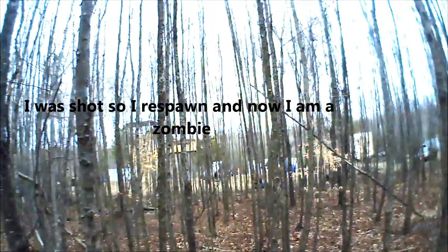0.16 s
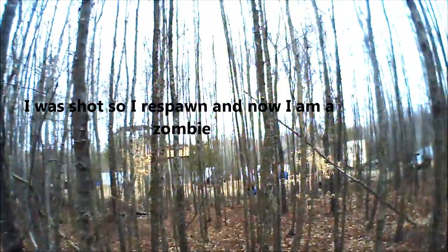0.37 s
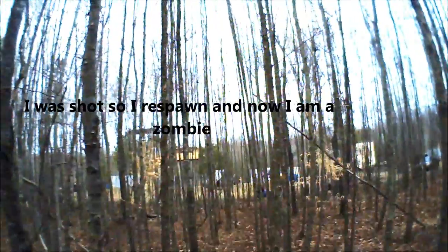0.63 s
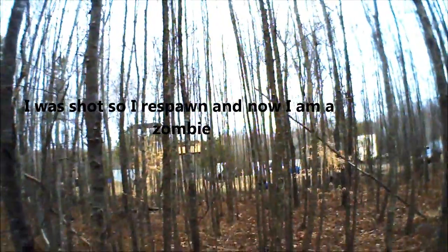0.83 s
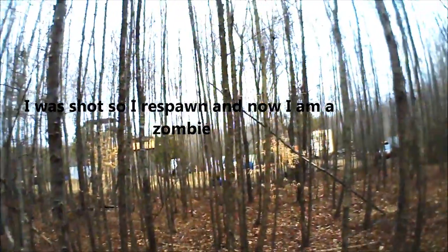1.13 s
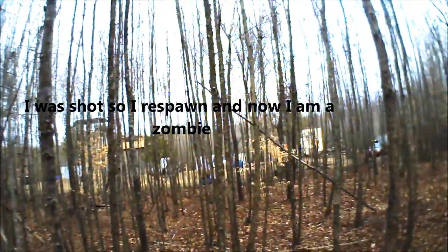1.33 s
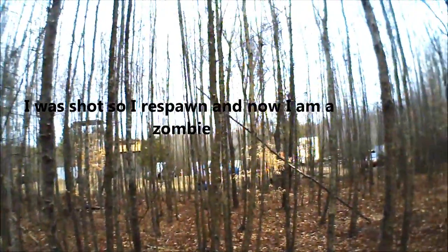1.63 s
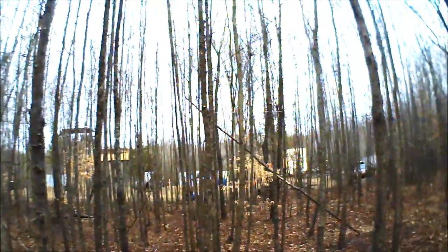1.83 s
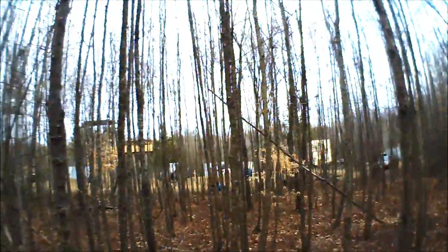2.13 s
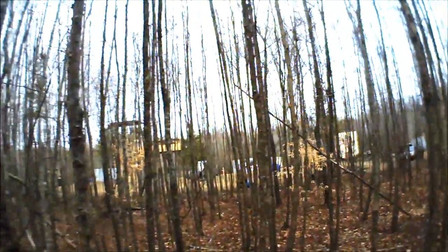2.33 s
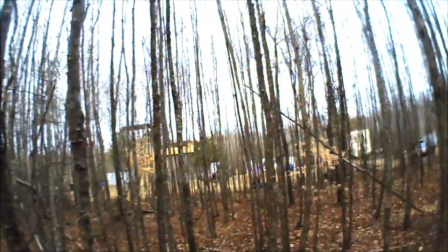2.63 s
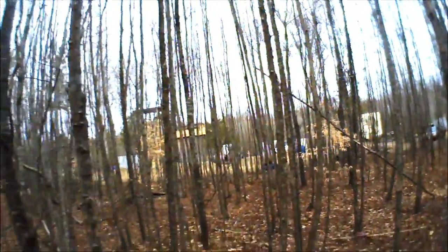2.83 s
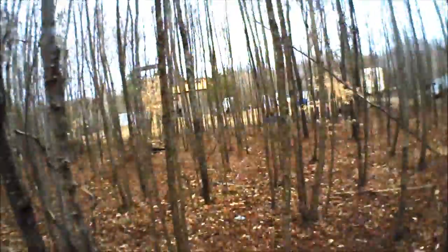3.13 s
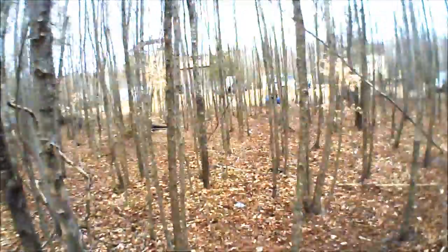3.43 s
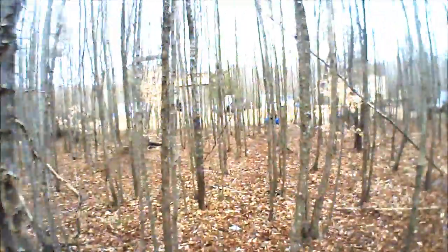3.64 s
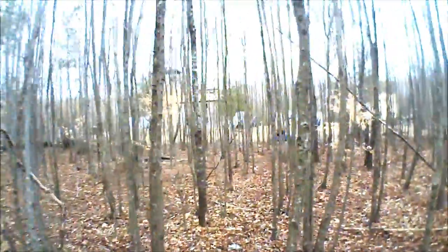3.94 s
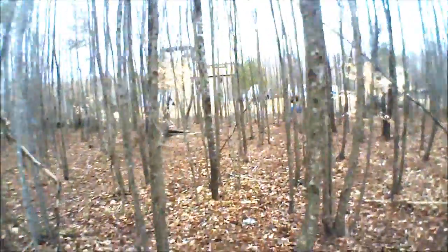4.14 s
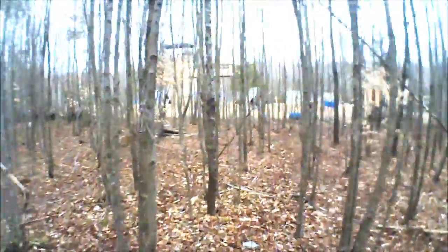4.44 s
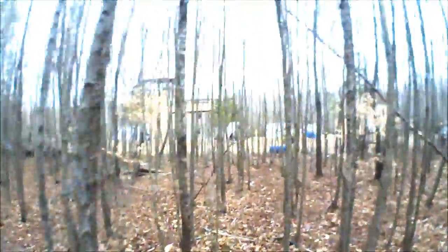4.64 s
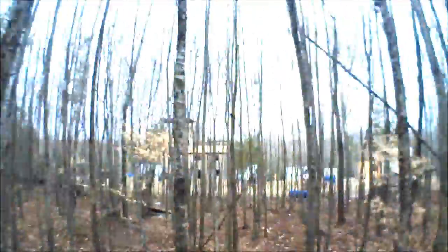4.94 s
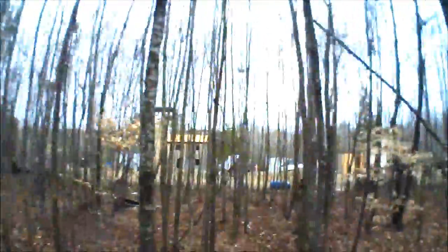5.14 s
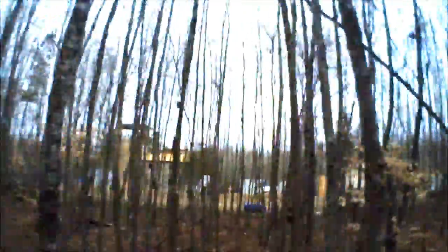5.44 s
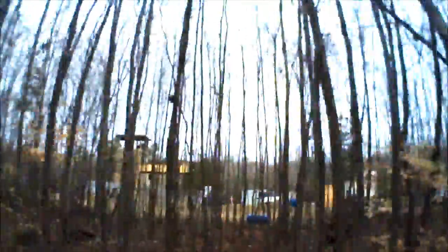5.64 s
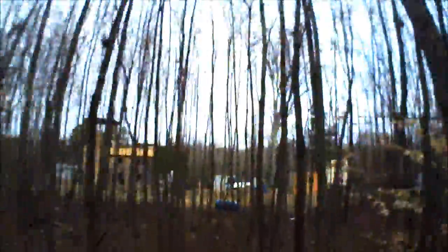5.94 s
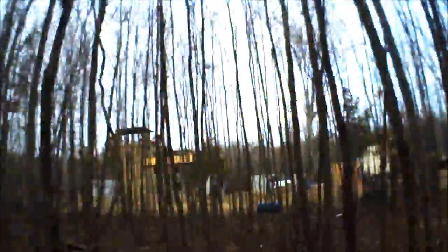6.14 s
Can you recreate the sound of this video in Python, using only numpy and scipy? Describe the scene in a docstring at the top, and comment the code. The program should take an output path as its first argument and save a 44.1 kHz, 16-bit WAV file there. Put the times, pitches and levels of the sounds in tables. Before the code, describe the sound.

Someone starts almost still among dry leaves, with low wind flutter and a faint steady electronic whine and ticking. A brief crackling step comes early, then mostly quiet litter stirring. Later, vigorous strides bring dense plastic-coloured crunching, bright snaps, dull knocks and heavy booming jolts, all very close to the head-mounted microphone outdoors.

```python
"""In a wood, someone walks through dry leaves with a small camera on the head.
Leaves crush and crackle as bursts of tiny random breaks, and twigs snap as short bursts of noise.
The plastic housing colours much of this. Gears knock against a mount that rings.
Wind (filtered noise) and the jolts of each stride (single humps of pressure) push the microphone.
Faint whistles waver, and the electronics whine, hum, chirr, hiss and tick underneath."""
import sys
import numpy as np
from scipy import signal
from scipy.fft import rfft, irfft
from scipy.io import wavfile
from scipy.ndimage import uniform_filter1d

SR = 44100
rng = np.random.default_rng(int(sys.argv[2]) if len(sys.argv) > 2 else 0)


def store_wav(level_fs):
    """Save 16-bit WAV to argv[1]."""
    pcm = np.round(np.clip(np.atleast_2d(level_fs), -1, 1) * 32767)
    wavfile.write(sys.argv[1], SR, pcm.T.astype(np.int16))


N = 276948  # length [samples]

# colour of large leaves being crushed, also the body of a snap: (frequency [Hz], filter gain [dB])
CRUSH_COLOUR = [(1300, -76), (1650, -1.5), (2300, -4.5), (3000, -7.5)]
# colour of fine litter swishing, also the sizzle of a snap: (frequency [Hz], filter gain [dB])
SWISH_COLOUR = [(6500, -6), (8000, -1.5), (11000, 3.5), (12700, -2), (13300, -8), (15000, 0), (16000, -22)]


def leaves():
    """Shoes scuff, large leaves crush dully, edges crackle and fine litter swishes, each by its own level."""
    # colours of the scuff and the crackle: (frequency [Hz], filter gain [dB])
    scuff_colour = [(600, -31), (900, -16.5), (1150, -0.5), (1500, 6), (1750, -3), (2100, -47)]
    crackle_colour = [(2000, -30), (2800, 5), (5000, -3), (7000, -2.5), (8500, -17)]
    # where the crackle is fullest: (time [s], centre [Hz], lift [dB])
    bite = [(0, 4000, -0.5), (1.1, 4150, 1), (1.33, 6200, 4.5), (1.55, 4220, -6), (1.72, 6040, 5),
            (2.0, 3750, 1.5), (3.2, 4000, 4), (4.1, 4300, 5), (4.5, 5330, 0), (5.3, 4700, 3.5),
            (6.28, 4560, 1)]
    # where the swish is brightest, as the litter changes: (time [s], centre [Hz], lift [dB])
    sheen = [(0, 10200, 3), (1.33, 9600, 5.5), (1.8, 10200, 1), (3.3, 11000, 0), (4.8, 11100, 2),
             (5.3, 11200, -9), (5.45, 12000, 10.5), (5.7, 10700, -2), (6.08, 11700, 5), (6.28, 10900, 5)]

    unevenness = gain_of(0.3 * lumps(4))  # shared by all four
    scuff_grains = unevenness * grains(4000, 1.0, 0.39)
    crush_grains = unevenness * grains(5000, 2.47, 0.21)
    crackle_grains = patchy(unevenness * grains(7000, 0.87, 0.24), 2.1, bite)
    swish_grains = patchy(unevenness * grains(9000, 1.9, 1.05), 1.35, sheen)

    scuff = evened(shaped(scuff_grains, scuff_colour))  # the scuff alone bypasses the housing
    crush = evened(housed(shaped(crush_grains, CRUSH_COLOUR)))
    crackle = evened(housed(shaped(crackle_grains, crackle_colour)))
    swish = evened(housed(shaped(swish_grains, SWISH_COLOUR)))
    return (leaf_levels() * np.array([crush, scuff, crackle, swish])).sum(axis=0)


def leaf_levels():
    """Loudness of crush, scuff, crackle and swish: bursts swell and fade over a steady stirring."""
    # steady stirring of the litter: (time [s], crush level [dB])
    stir = [(0.0, -62.5), (0.5, -61), (0.75, -65), (1.1, -57), (1.6, -65.5), (2.3, -59.5), (2.6, -65),
            (3.1, -66), (3.6, -61.5), (4.1, -53), (4.4, -50.5), (5.0, -43.5), (6.28, -45)]
    # stirring levels of scuff, crackle and swish, relative to crush [dB]
    stir_colour_db = [-11, -4, -4]
    # a burst of leaf noise, dull, crackling or swishing, swells and fades:
    # (start [s], rise [s], hold [s], fall [s], crush level [dB],
    # then relative to crush: scuff [dB], crackle [dB], swish [dB])
    leaf_bursts = [(0.055, 0.019, 0.075, .03, -57, -9, -0.5, -6),
                   (0.166, 0.017, 0.036, .08, -62, -9, 3, -4), (1.034, 0.08, 0.079, 0.046, -74, -16, 3, -4),
                   (1.1, .015, 0.01, 0.034, -62, -12, 13, -2),
                   (1.164, .015, 0.014, 0.036, -59.5, -16, 10.5, 0),
                   (1.173, .08, 0.054, .05, -49, -21, 2, -14),
                   (1.259, 0.069, 0.019, 0.051, -36.5, -13.5, 2.5, 0.5),
                   (1.353, 0.032, 0.019, 0.21, -49.5, -13, 2.5, 4.5),
                   (1.641, 0.096, 0.014, 0.057, -41.5, -14.5, 7, 4),
                   (1.717, 0.052, 0.047, .12, -41, -23, -5.5, -3),
                   (1.925, 0.073, 0.045, 0.14, -52.5, -18, -7, -17),
                   (2.078, 0.055, 0.097, 0.16, -61, -9, -7, -13),
                   (3.136, 0.036, 0.24, 0.26, -60.5, -16, 2.5, 0),
                   (3.15, 0.12, 0.18, .12, -67, -7, -2, 11.5), (3.612, 0.079, 0.11, .1, -58.5, -22, 0, -2),
                   (3.74, .1, .15, 0.13, -58, -14, 3, 5), (4.13, 0.11, .1, 0.18, -47, -22, -6.5, -16),
                   (4.294, 0.091, 0.043, .08, -43, -12, -8, -20),
                   (4.392, 0.073, 0.064, 0.16, -41.5, -6, -1, -3),
                   (4.547, 0.043, 0.025, 0.051, -42.5, -1.5, -4, -5),
                   (4.657, 0.057, 0.087, 0.096, -40.5, -5.5, -4.5, -13),
                   (4.888, 0.059, 0.035, .05, -45.5, -4, -5, -3),
                   (4.96, 0.042, .02, 0.045, -46.5, -4, 1, 4), (5.0, 0.047, 0.051, 0.15, -42, -8, -4, -13),
                   (5.241, 0.055, 0.027, 0.058, -44, -9, 1.5, 5.5),
                   (5.355, .05, 0.06, 0.092, -44.5, -11.5, 4, 6.5),
                   (5.51, 0.059, 0.11, 0.14, -41, -5.5, -2.5, -6),
                   (5.696, 0.045, .13, 0.23, -43, -2.5, -1, -7.5),
                   (5.899, 0.046, 0.074, 0.067, -42, -3.5, 1, -1.5),
                   (6.008, 0.042, 0.068, 0.066, -42.5, -2, 4.5, 5.5),
                   (6.159, .06, 0.043, 0.026, -36.5, -7, 3, -5)]
    slope_db = 20  # change of level over one rise or one fall

    t = np.arange(N) / SR
    stir_db = columns(stir)[0] + np.array([0, *stir_colour_db])[:, None]
    power = gain_of(stir_db) ** 2
    for start, rise, hold, fall, crush_db, *colour_db in leaf_bursts:
        before = 1 - (t - start) / rise
        after = (t - start - rise - hold) / fall
        distance = np.maximum(np.maximum(before, after), 0)  # 0 during the hold
        peaks = gain_of(crush_db + np.array([0, *colour_db]))
        power += np.outer(peaks, gain_of(-slope_db * distance)) ** 2
    return np.sqrt(power)


def grains(per_s, spread_db, clump_db):
    """Many tiny breaks of unequal size, at random times, stronger in some clumps than in others."""
    size_db = spread_db * np.minimum(rng.exponential(1, N), 4) + clump_db * lumps(7.4)
    breaks = rng.random(N) < per_s / SR
    return gain_of(size_db) * rng.standard_normal(N) * breaks


def patchy(x, patch_db, lift=None):
    """Colour that wanders in patches, as each leaf rings in its own way; a lift may glide through it."""
    hz, t, spectrum = signal.stft(x, SR, nperseg=256)
    field = rng.standard_normal(spectrum.shape)
    field = uniform_filter1d(field, size=4, axis=0)  # smooth over frequency
    field = uniform_filter1d(field, size=12, axis=1)  # smooth over time
    field_db = patch_db * evened(field)
    if lift:
        s, centre, lift_db = np.transpose(lift)
        away = (hz[:, None] - np.interp(t, s, centre)) / 600
        field_db += np.interp(t, s, lift_db) * np.exp(-away ** 2)
    return signal.istft(spectrum * gain_of(field_db), nperseg=256)[1][:len(x)]


def snaps():
    """Twigs and stiff leaves snap: a sudden burst of splinters that dies within a few ms."""
    # (time [s], crack level [dB], body relative to crack [dB], sizzle relative to crack [dB],
    # decay time constant [ms])
    snap_list = [(0.0702, -58, 14, 1, 2), (0.136, -47, 4, -3, 2.3), (0.853, -58, 16, -1, 2),
                 (1.33, -29, -7, 8, 1.5), (1.339, -32, -12, 1, 1.5), (1.4358, -41, -20, 11, 1.8),
                 (1.6805, -43, -6, -3, 2), (1.7296, -30, -9, 0, 3.5), (1.7363, -28.5, -6, 4, 3.2),
                 (1.7844, -34, -5, 4, 2), (1.8054, -37, -10, -3, 2.2), (4.1365, -48.5, 11.5, 2, 2.5),
                 (4.8895, -27, -6, -5, 5.3), (4.8951, -29.5, -8, -5, 5), (4.95, -37, -7, -10, 2.2),
                 (4.9996, -42, -1, -5, 2.4), (5.252, -25.5, -10, -8, 2.7), (5.3108, -35, -7, -8, 4.1),
                 (5.467, -37, -19, 13.5, 3), (5.5114, -53, 2, -6, 2), (5.5877, -22.5, -23, -4, 4.8),
                 (5.8587, -22, -11, -1, 4.3), (6.0774, -34, -5, 4, 2), (6.1478, -23.5, -18, -2.5, 3.8),
                 (6.184, -32, -14, 0, 3.6), (6.2095, -37, 5, 13.5, 2.3), (6.2429, -22.5, 6, 3.5, 4),
                 (6.2624, -43, -12, -16, 1.7)]
    # colour of the splintering crack: (frequency [Hz], filter gain [dB])
    splinter_colour = [(2000, -7), (3000, 5), (4800, 8), (6500, 9.5), (7500, -8), (9000, -75)]
    fibres_db, fibres_late = -19, 295  # the last fibres give way about 7 ms later [dB, samples]
    lead = 512  # room ahead of the snap for the filters [samples]

    out, t = np.zeros(N), np.arange(4096) / SR
    for s, crack_db, body_db, sizzle_db, decay_ms in snap_list:
        fade = np.minimum(t / 0.00086, 1) * np.exp(-t / (decay_ms / 1000))
        fade = np.roll(fade, lead) + gain_of(fibres_db) * np.roll(fade, lead + fibres_late)
        burst = fade * rng.standard_normal(len(t))
        parts = (shaped(burst, splinter_colour),
                 housed(shaped(burst, CRUSH_COLOUR)),
                 housed(shaped(burst, SWISH_COLOUR), -54))
        # give all three parts the energy of the fade
        crack, body, sizzle = (p / np.linalg.norm(p) * np.linalg.norm(fade) for p in parts)
        sound = crack + gain_of(body_db) * body + gain_of(sizzle_db) * sizzle
        add(out, s - lead / SR, gain_of(crack_db) * sound)
    return out


def knocks():
    """Gear knocks on its mount: a short blow pushes the air once and sets low and high modes ringing."""
    # (time [s], thud drive [dB], ring drive [dB], scale of the first push [dB])
    knock_list = [(4.1351, -29.5, -43.5, -36), (4.8947, -33, -20, -17.5), (4.973, -30, -46, -28),
                  (5.2763, -21, -34, -26), (5.619, -29.5, -55, -24)]
    # modes of the mount: (frequency [Hz], level added to the drive [dB], time to fall 60 dB [s],
    # kind [0 thud, 1 ring])
    mount_modes = [(128, -2, 0.13, 0), (181, -1, 0.024, 0), (470, 5, 0.0048, 0), (780, 7, 0.018, 1),
                   (1120, 8.5, 0.019, 1), (1340, 5, 0.01, 1)]

    out, t = np.zeros(N), np.arange(4000) / SR
    u = t / 0.00047
    push = u * (1 - u / 3) * np.exp(1 - u)
    for s, *drive_db, push_db in knock_list:
        add(out, s, gain_of(push_db) * push)
        for hz, db, t60, kind in mount_modes:
            fade = gain_of(db - 60 * t / t60) * np.minimum(t / 0.0013, 1)
            mode = fade * np.cos(2 * np.pi * hz * t)
            add(out, s, gain_of(drive_db[round(kind)]) * mode)
    return out


def jolts():
    """The head jolts and pushes the membrane: one hump of pressure with a dip on either side."""
    # (time of the peak [s], peak level [dB], half width of the hump [ms])
    jolt_list = [(2.305, -28.5, 7.1), (2.352, -30, 6.6), (2.825, -26, 8.1), (4.168, -12.5, 18),
                 (4.247, -11, 14), (4.526, -11.5, 12.6), (4.596, -6, 6.5), (5.012, -10.5, 9.1),
                 (5.066, -15, 5.6), (5.108, -10, 9.7), (5.214, -7.5, 11), (5.423, -31, 7),
                 (5.566, -4, 17.6), (5.652, -5, 8), (5.709, -13, 6.2), (5.841, -11.5, 4.7),
                 (5.931, -11, 14), (6.001, 0, 7.5), (6.021, 0.5, 11.1), (6.259, -9, 11.5)]
    out, t = np.zeros(N), np.arange(-2646, 2646) / SR
    for s, db, half_ms in jolt_list:
        u = t / (half_ms / 1000)
        hump = (1 - u ** 2) * np.exp(-u ** 2 / 2)
        add(out, s + t[0], gain_of(db) * hump)
    return out


def wind():
    """Air past the moving head: lumpy low pressure swings, a gusty roar and a hollower rush."""
    # slow trend: (time [s], rumble level [dB], roar level [dB], hollow rush level [dB])
    wind_trend = [(0.0, -38.5, -53, -66), (0.6, -39.5, -52.5, -68), (1.5, -45.5, -52, -64),
                  (1.9, -42.5, -50, -63), (2.7, -52.5, -54, -66.5), (3.3, -38, -53, -65),
                  (3.6, -34.5, -56, -64.5), (4.05, -35, -54.5, -67.5), (4.22, -31, -48.5, -57.5),
                  (4.4, -24, -49, -55), (4.6, -16, -44, -55.5), (4.76, -30, -47, -56),
                  (5.05, -12, -41.5, -53.5), (5.18, -21.5, -43.5, -50.5), (5.45, -14, -44, -56),
                  (5.75, -18, -42, -52), (6.02, -11, -36, -51.5), (6.15, -19.5, -43, -53.5),
                  (6.28, -11.5, -32.5, -40.5)]
    # single buffets on top of the rumble: (time of the peak [s], rumble level [dB], half width [s])
    buffets = [(0.2, -35, .05), (0.45, -36, 0.035), (0.71, -33.5, 0.019), (0.9, -24.5, 0.036),
               (1.15, -32.5, 0.055), (1.32, -31.5, 0.04), (1.56, -40.5, 0.026), (1.75, -31.5, 0.048),
               (2.01, -39, 0.064), (2.33, -42, .05), (2.51, -36, 0.04), (2.83, -39, 0.017),
               (3.1, -34.5, 0.077), (3.31, -29, 0.028), (3.5, -24.5, 0.032), (3.7, -28.5, 0.033),
               (3.88, -35, 0.025), (4.16, -21, 0.086), (5.299, -15, 0.059), (5.65, -8.5, 0.024),
               (5.849, -10.5, 0.021), (6.001, -6.5, 0.025)]
    # colours of the rumble, the roar and the hollow rush: (frequency [Hz], filter gain [dB])
    rumble_colour = [(2.9, -34), (5.0, 4), (21, 1.5), (40, -2.5), (52, -8.5), (76, -18.5), (200, -49.5),
                     (260, -66), (440, -120)]
    roar_colour = [(55, -53), (85, 3.5), (130, -4), (200, -16.5), (300, -17), (500, -31)]
    hollow_colour = [(250, -19), (400, -5.5), (540, -2), (750, -3), (1000, -6), (1500, -4)]

    rumble_db, roar_db, hollow_db = columns(wind_trend)
    t = np.arange(N) / SR
    power = gain_of(rumble_db) ** 2
    for s, db, half in buffets:
        power += gain_of(db) ** 2 * np.exp(-((t - s) / half) ** 2)
    rumble = evened(shaped(rng.standard_normal(N), rumble_colour))
    rumble /= np.sqrt(0.14 + 0.83 * uniform_filter1d(rumble ** 2, 6000))  # eddies keep a bounded strength

    gusts = lumps(4.5)
    roar = evened(shaped(rng.standard_normal(N), roar_colour) * gain_of(5.3 * gusts))
    hollow = evened(shaped(rng.standard_normal(N), hollow_colour) * gain_of(4.2 * gusts))
    return np.sqrt(power) * rumble + gain_of(roar_db) * roar + gain_of(hollow_db) * hollow


def whistles():
    """Faint tones and chirps that waver in pitch, flutter in level, and swell and fade."""
    # (start [s], end [s], frequency before wavering [Hz], level before flutter and fades [dB])
    whistle_list = [(0.608, 0.617, 2090, -50), (1.423, 1.67, 4230, -66), (2.446, 2.473, 2100, -57),
                    (2.84, 2.864, 2080, -58), (3.197, 3.357, 1060, -65), (3.484, 3.763, 3110, -66.5)]
    out = np.zeros(N)
    waver = np.cumsum(45 * lumps(9.0)) / SR  # pitch strays by about 45 Hz; in turns
    flutter = gain_of(4.3 * lumps(6.5))
    for start, end, hz, db in whistle_list:
        t = np.arange(start, end, 1 / SR)
        turns = hz * t + waver[round(start * SR):][:len(t)]
        tone = np.sqrt(2) * np.sin(2 * np.pi * turns)
        add(out, start, gain_of(db) * tone * signal.windows.tukey(len(t), .6))
    return out * flutter


def electronics():
    """Hiss, hum, whine and chirr, and a sag of the supply with a small tick at each picture frame."""
    # (time [s], whine level [dB], slip rate before the sag weighs it [per s], chirr drive [dB])
    whine_trend = [(0, -50, 1, -62), (1.9, -50, 0, -64), (2.2, -51, 25, -64), (3, -51, 40, -63),
                   (3.5, -51.5, 36, -65), (4.0, -51, 41, -80), (4.5, -52.5, 28, -85),
                   (6.28, -51.5, 18, -85)]
    # hum tones: (frequency [Hz], level [dB])
    hum_tones = [(375.5, -68), (404, -76), (625, -72), (877, -75.5), (1125, -78)]
    # tones of the frame tick: (frequency [Hz], level before the sag shapes it [dB])
    tick_tones = [(4270, -61.5), (5150, -63), (9000, -62)]
    # colour of the hiss: (frequency [Hz], filter gain [dB])
    hiss_colour = [(60, -37), (100, -5.5), (300, -20), (470, -24.5), (1500, -34), (2500, -27.5),
                   (4200, -31.5), (7000, -30), (9000, -26.5), (10500, -24), (12500, -27.5), (13500, -26),
                   (15900, -25)]
    whine_hz, chirr_hz, chirr_per_s = 10000.3, 12455, 32.6
    frame_hz, first_sag_s = 30.056, .0262  # frame rate, and when a sag is first deepest
    hiss_db, sag_db = -57.5, -36.5

    t = np.arange(N) / SR
    whine_db, slips_per_s, chirr_db = columns(whine_trend)

    frames = (t - first_sag_s + .004) * frame_hz + 1  # a sag is deepest 4 ms into its frame
    since, number = frames % 1 / frame_hz, frames.astype(int)
    uneven = rng.uniform(.6, 1.4, number[-1] + 1)[number]
    load = (.65 + .7 * (number % 2)) * uneven  # every second frame tends to draw more
    sag = load * (since / 0.0021) ** 2 * np.exp(2 - since / .002) / 4

    # now and then the whine slips one cycle, mostly while the supply sags
    chance = slips_per_s / SR * (.4 + 2.7 * sag)
    slips = uniform_filter1d(1. * (rng.random(N) < chance), 260)  # each slip takes about 6 ms
    turns = whine_hz * t - np.cumsum(slips) + 0.027 * lumps(3.6)
    slip_dip = 1 - 110 * np.minimum(slips, .005)  # the whine is weaker during a slip
    whine = gain_of(whine_db) * slip_dip * np.sin(2 * np.pi * turns)

    hum = np.zeros(N)
    for hz, db in hum_tones:
        hum += gain_of(db) * np.sin(2 * np.pi * (hz * t + rng.random() + 0.13 * lumps(61)))

    # a thin chirr switches on and off above the whine
    chirr = gain_of(chirr_db) * np.sin(2 * np.pi * (chirr_hz * t + .12 * lumps(6)))
    switching = np.clip(.5 + 1.5 * np.sin(2 * np.pi * chirr_per_s * t), 0, 1)
    chirr *= gain_of(2.3 * lumps(25)) * switching

    hiss = gain_of(hiss_db) * evened(shaped(rng.standard_normal(N), hiss_colour))

    tick = np.zeros(N)
    for hz, db in tick_tones:
        tick += gain_of(db) * np.sin(2 * np.pi * (hz * since + 0.1 * lumps(1.6)))
    tick *= sag / np.sqrt(load)

    supply = gain_of(sag_db) * (sag - uniform_filter1d(sag, 1500))  # the slow average is taken out
    return np.sqrt(2) * (whine + hum + chirr) + hiss + tick - supply


def housed(x, between_db=-17):
    """Passes sound through the resonances of the housing, with a weak direct path between them."""
    # air and wall resonances before the microphone: (frequency [Hz], width [Hz], level [dB])
    resonances = [(1926, 176, 2), (3164, 280, -15), (3893, 185, -2), (4920, 640, -15), (5750, 97, -14),
                  (6110, 110, -17), (7500, 150, -16.5), (8370, 430, -11), (10010, 1500, -11),
                  (10570, 320, -19), (11950, 590, -10)]
    f = np.fft.rfftfreq(len(x), 1 / SR)
    response = gain_of(between_db)
    for hz, width, db in resonances:
        response = response + gain_of(db) * 1j * f * width / (hz ** 2 - f ** 2 + 1j * f * width)
    return irfft(rfft(x) * response, len(x))


def shaped(x, points):
    """Filters by a curve of (frequency [Hz], gain [dB]) points; beyond its ends almost nothing passes."""
    hz, db = np.transpose(points)
    f = np.fft.rfftfreq(len(x), 1 / SR)
    curve_db = np.interp(np.log(f + 1), np.log(hz + 1), db, -90, -90)
    return irfft(rfft(x) * gain_of(curve_db), len(x))


def lumps(ms):
    """Smooth random curve of rms 1 that changes every few ms."""
    size = round(ms * SR / 1000)
    once = uniform_filter1d(rng.standard_normal(N), size)
    return evened(uniform_filter1d(once, size))


def gain_of(db):
    """Turns decibels into amplitude."""
    return 10 ** (np.asarray(db) / 20)


def evened(x):
    """Scales to rms 1."""
    return x / np.sqrt(np.mean(x ** 2) + 1e-20)


def columns(rows):
    """Draws each column of a table as a curve over time, one value a sample."""
    s, *values = np.transpose(rows)
    return [np.interp(np.arange(N) / SR, s, v) for v in values]


def add(mix, s, sound):
    """Mixes a sound in at s seconds."""
    part = mix[round(s * SR):][:len(sound)]
    part += sound[:len(part)]


def scene():
    """All sources added up at the single microphone."""
    return (leaves() + snaps() + knocks() + jolts() + wind() + whistles() + electronics())[None]


def record(dry):
    """The strongest pushes clip at full scale; then a low-pass filter removes the top of the treble."""
    edge_hz = 15800
    low_pass = signal.firwin(1201, edge_hz, window=("kaiser", 8), fs=SR)
    return signal.oaconvolve(np.clip(dry, -1, 1), low_pass[None], "same")


dry = scene()
out = record(dry)
store_wav(out)
```